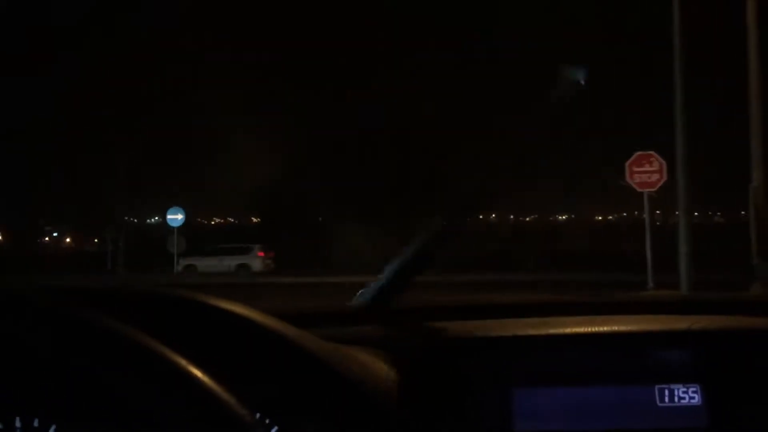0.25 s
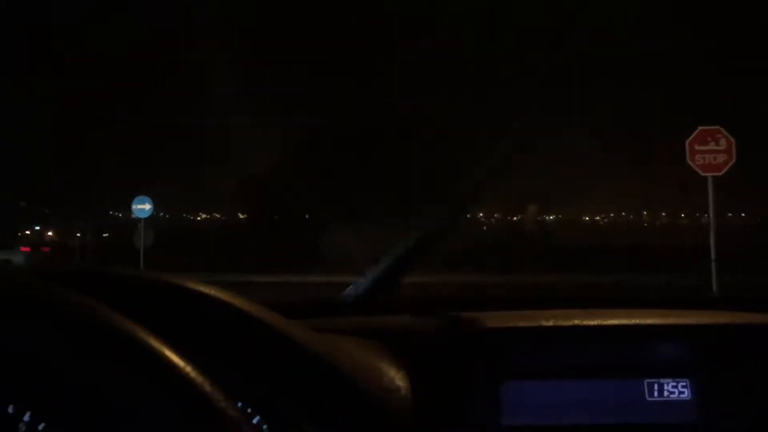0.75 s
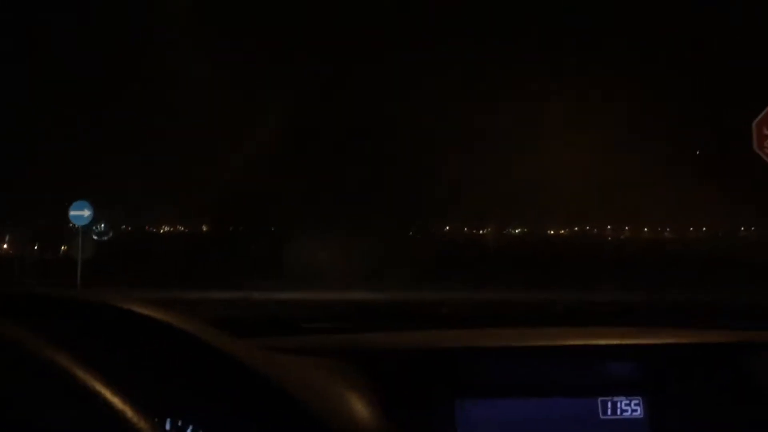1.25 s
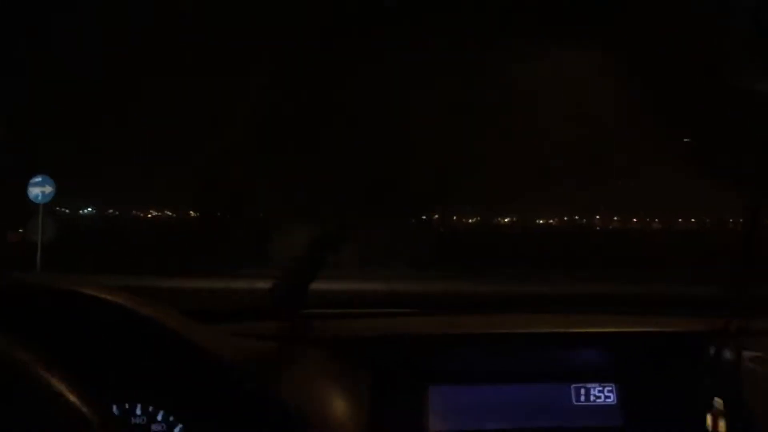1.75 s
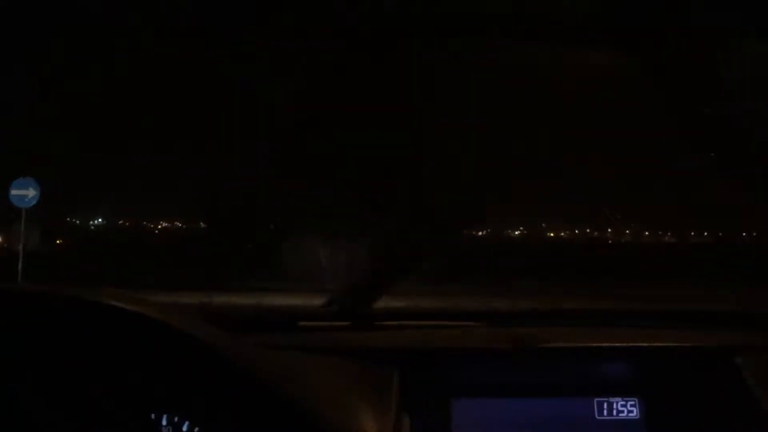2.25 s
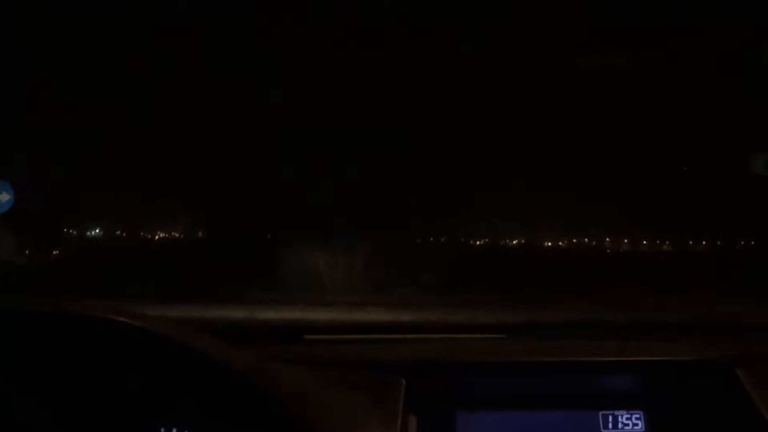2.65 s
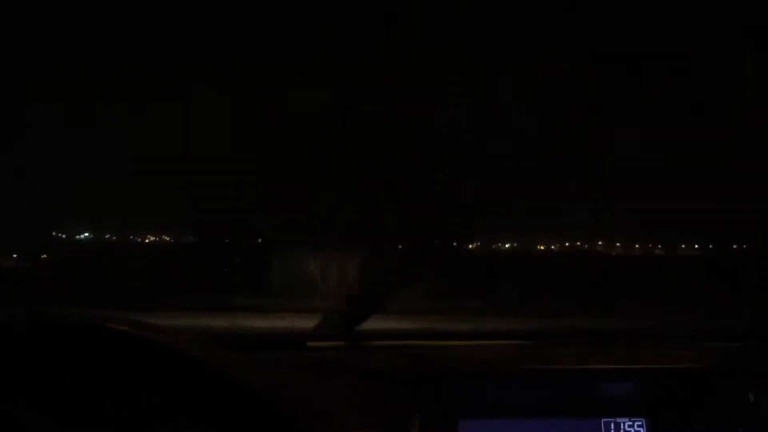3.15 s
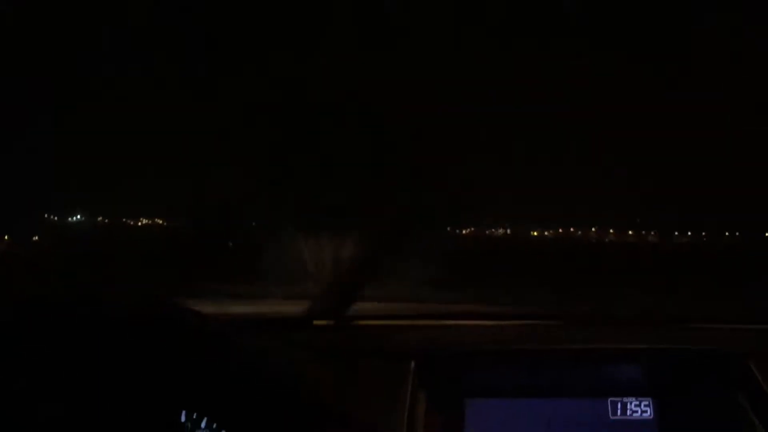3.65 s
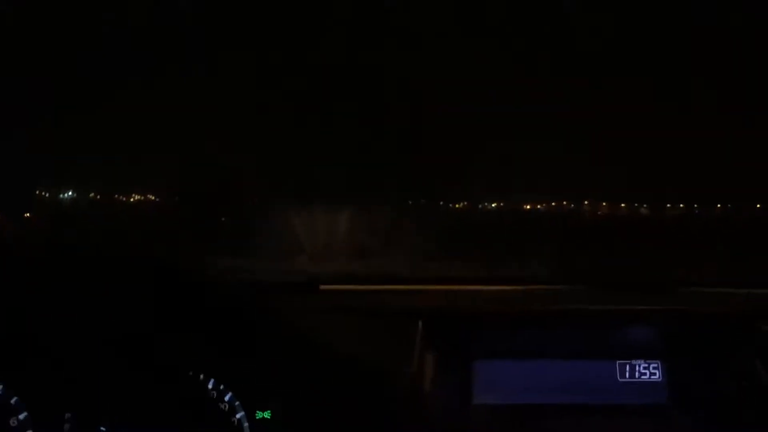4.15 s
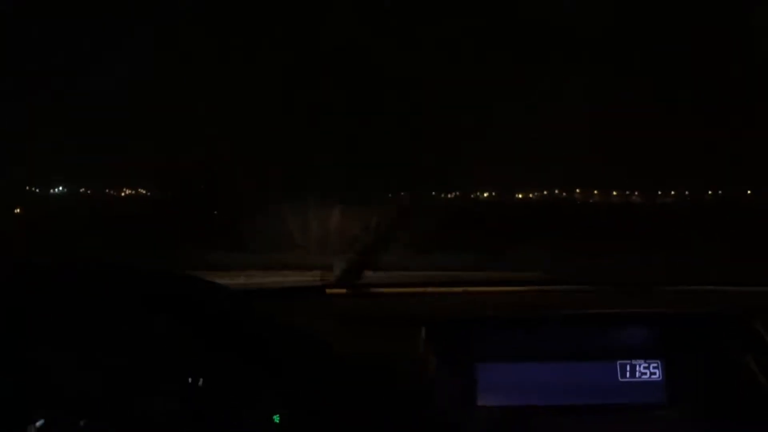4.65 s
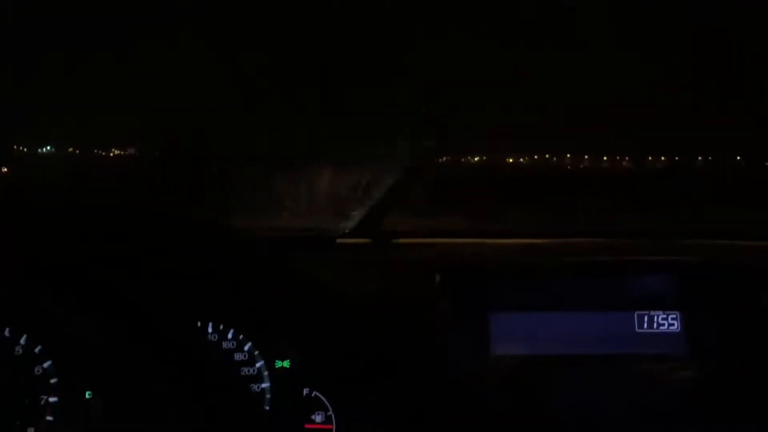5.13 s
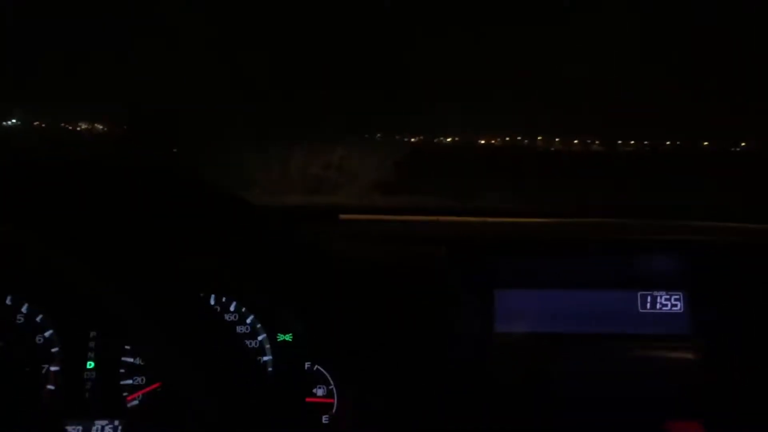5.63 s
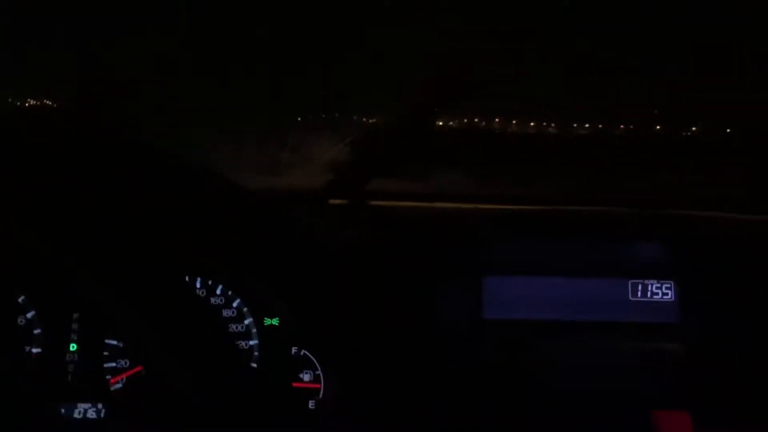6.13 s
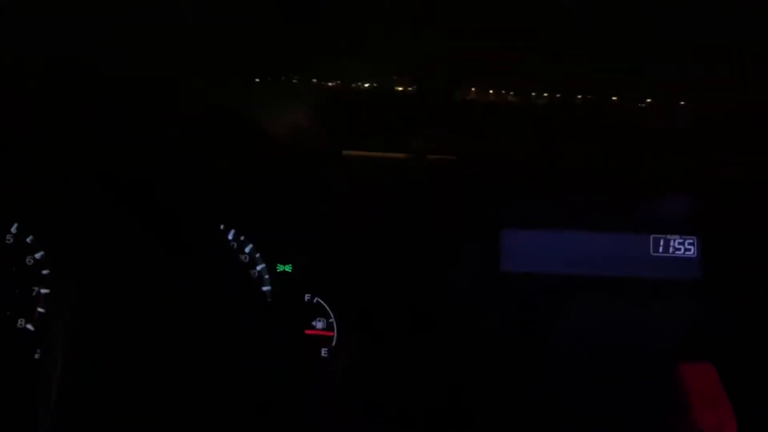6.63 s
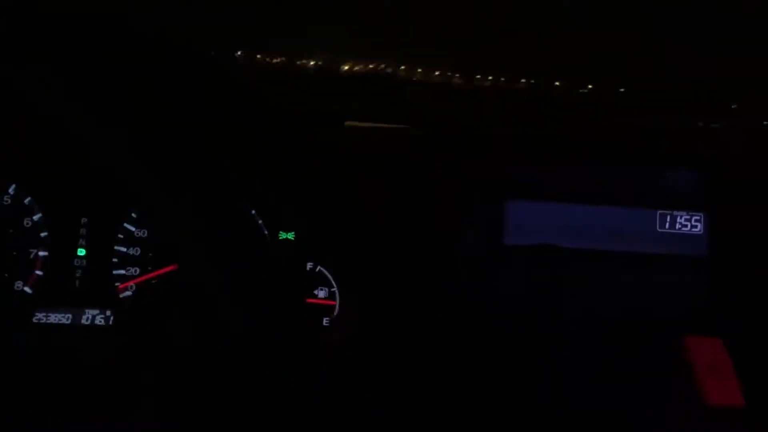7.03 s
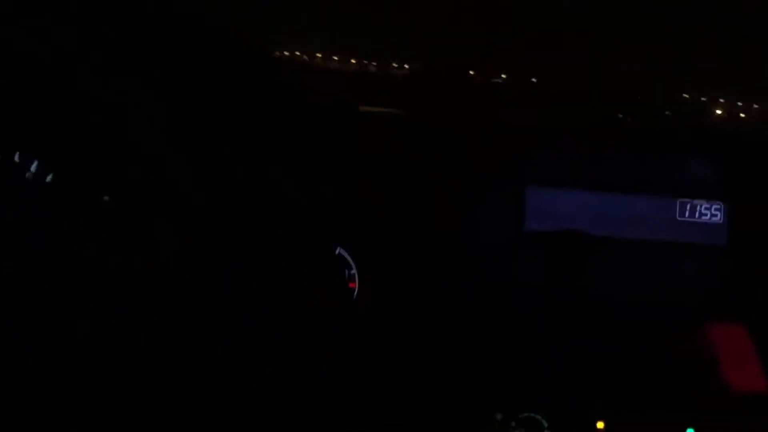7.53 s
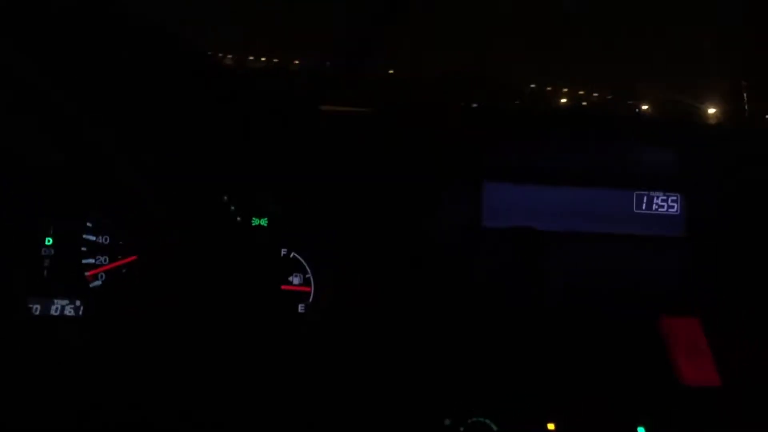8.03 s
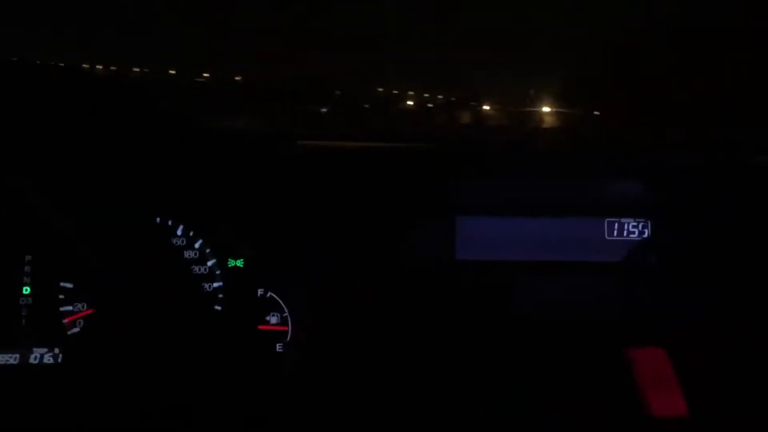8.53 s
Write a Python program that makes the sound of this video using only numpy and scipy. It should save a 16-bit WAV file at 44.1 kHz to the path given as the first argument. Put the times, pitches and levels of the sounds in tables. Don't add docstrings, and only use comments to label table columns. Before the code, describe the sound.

A close microphone on the driver's side of a boomy car cabin picks up bright rain ticks on glass, muffled roof patter and occasional hollow knocks. Wiper turns make regular deep double thuds. The engine slows, with a faint falling gear whine early on, then pulls again; a drive shaft hum rises near the end. Tyres rumble throughout, while rain thins midway but keeps arriving in small bursts.

```python
import sys
import numpy as np
from scipy import signal
from scipy.fft import rfft, irfft
from scipy.io import wavfile
from scipy.ndimage import uniform_filter1d

SR = 44100
rng = np.random.default_rng(int(sys.argv[2]) if len(sys.argv) > 2 else 0)


def ratio_of_db(decibels):
    return 10 ** (np.asarray(decibels, float) / 20)


def file_out(sig):
    cols = np.atleast_2d(sig).T
    lim = np.clip(cols, -1, 1)
    pcm = np.round(lim * 32767).astype(np.int16)
    wavfile.write(sys.argv[1], SR, pcm)


N = 387198


def level(x, db):
    return x * ratio_of_db(db) / np.sqrt(np.mean(x ** 2))


def columns(table):
    s, *rest = np.transpose(table)
    return [np.interp(np.arange(N) / SR, s, column) for column in rest]


def ring(x, hz, width_hz):
    return signal.lfilter(*signal.iirpeak(min(hz, .46 * SR), hz / width_hz, fs=SR), x)


def walk(rate):
    hold = int(SR / rate)
    steps = np.repeat(rng.standard_normal(N // hold + 1), hold)
    return 1.33 * uniform_filter1d(uniform_filter1d(steps, hold), hold)[:N]


def fade(power, t60):
    return signal.lfilter([1], [1, -np.exp(-2 * np.log(1000) / (t60 * SR))], power)


def hum(hz, db, orders, wobble):
    turn = 2 * np.pi * np.cumsum(hz * (1 + wobble * walk(9))) / SR
    out = 0
    for multiple, order_db in orders:
        size = ratio_of_db(1 + db + order_db + 1.2 * walk(6))
        out = out + size * np.sin(multiple * turn + 6 * rng.random())
    return out


# (pitch [Hz], width [Hz], level [dB])
BODY = [(167.3, 40, 3.5), (207.6, 14.2, 2.5), (247, 29, -2.5), (395, 107, -7), (860, 400, -24)]
BOOM_HZ, BOOM_WIDTH_HZ = 125, 25.3


def cabin(boom_force, body_force):
    boom = ring(ring(boom_force, BOOM_HZ, BOOM_WIDTH_HZ), BOOM_HZ, 3 * BOOM_WIDTH_HZ)
    body = sum(ratio_of_db(db) * ring(ring(body_force, f, w), f, 2 * w) for f, w, db in BODY)
    return ratio_of_db(26.5) * boom + ratio_of_db(20.5) * body


# (time [s], firing rate [Hz], firing level [dB], load on the upper multiples [dB])
ENGINE = [(0, 72.4, -33.5, 5), (.6, 67.86, -38, 10), (1.5, 70, -38, -2), (2.4, 76.63, -30.5, -9),
          (3, 76.24, -29, -7), (3.5, 68.1, -36.5, -10), (4.2, 56.26, -37.5, -4), (4.7, 52.7, -39, -3),
          (5.2, 53.64, -36.5, -13), (5.7, 58.37, -31, -2), (5.95, 60.93, -32.5, 1), (6.5, 62.55, -30, -3.5),
          (6.8, 62.8, -29.5, -8.5), (7.9, 63.8, -29.5, -25), (8.2, 63.4, -59, -4), (8.78, 63.2, -63, -2)]
# (multiple of the firing rate [-], level [dB])
ENGINE_ORDERS = [(.5, -10), (1, 0), (1.5, -12), (2, -6), (2.5, -10), (3, -12), (4, -11)]
# (time [s], rate [Hz], level [dB])
SHAFT = [
    (6.2, 65.5, -63),
    (6.7, 67.8, -42),
    (7.3, 69.9, -36),
    (7.7, 70.4, -55),
    (8.1, 75.23, -32.5),
    (8.3, 81.33, -29.5),
    (8.55, 84.7, -35.5),
    (8.78, 87.7, -28),
]
# (multiple of its rate [-], level [dB])
SHAFT_ORDERS = [(.5, -31), (1, 0.5), (3, -18.5)]
# (time [s], pitch [Hz],
# level [dB])
WHINE = [(.1, 396, -100), (.3, 390, -49), (.54, 379.4, -39.5), (.92, 361.7, -42.5), (1.08, 350, -58),
         (1.12, 438, -56), (1.22, 434, -44), (1.55, 407.8, -48), (1.95, 360.8, -45.5), (2.2, 346, -67),
         (3.4, 400, -70), (3.44, 405.4, -43), (3.55, 406, -43), (3.6, 403, -80)]
# (time [s], rumble level [dB])
TYRES = [(0, -25), (.96, -25.5), (1.35, -23.5), (1.45, -27), (1.85, -29), (2.15, -25.5), (2.75, -35),
         (3.0, -29), (4.6, -36.5), (5.6, -33.5), (6.5, -31.5), (7.2, -29), (8.0, -30.5), (8.78, -27)]
# (frequency [Hz], level per Hz [dB])
ROAD = [(20, -34), (32, -3.5), (45, -0.5), (65, -1), (100, -3.5), (200, -22.5), (400, -23.5), (900, -42),
        (3000, -56), (16000, -73.5)]


def drive():
    t = np.arange(N) / SR
    firing_hz, firing_db, load_db = columns(ENGINE)
    coasting = np.clip((4.2 - t) / 0.412, 0, 1)
    orders = [(k, db + (k > 1) * (load_db - 8 * coasting)) for k, db in ENGINE_ORDERS]
    engine = hum(firing_hz, firing_db, orders, wobble=.005 + .09 * coasting)
    shaft = hum(*columns(SHAFT), SHAFT_ORDERS, wobble=0.0091)
    gears = hum(*columns(WHINE), [(0.98, 0)], wobble=0.004)

    rumble_db, = columns(TYRES)
    f = np.fft.rfftfreq(N, 1 / SR) + 1
    road_hz, road_db = np.transpose(ROAD)
    colour = ratio_of_db(np.interp(np.log(f), np.log(road_hz), road_db, left=-40))
    rumble = level(irfft(rfft(rng.standard_normal(N)) * colour, N), -3.5)
    rumble = rumble * ratio_of_db(rumble_db + 0.44 * walk(6.7))

    fading_db = -0.5263 * t
    boom_db = -31 + fading_db + 0.81 * (rumble_db + 30.0)
    body_db = -35.5 + fading_db + 0.23 * (rumble_db + 29.5)
    bumps_db = [boom_db - 0.5 + 0.95 * walk(9.3), body_db + 1.8 * walk(11)]
    bumps = rng.standard_normal((2, N)) * ratio_of_db(bumps_db)
    return engine + shaft + gears + rumble + cabin(*bumps)


# (frequency [Hz], level per band [dB], tail t60 [s])
GLASS = [(570, -18, 0.09), (874, -17, 0.22), (1480, -7, 0.084), (3000, -2, 0.082), (4000, -3.5, 0.077),
         (7200, -12.5, 0.047), (9400, -17, 0.07), (12000, -14.5, 0.074), (15800, -33, 0.044)]
BANDS = 500 * 2 ** np.arange(0, 5.1, 1 / 3)
BENDING_LAG_S = .00105


def splash(s, band_db, crack_s, tail_db, tick_db):
    glass_hz, glass_db, glass_t60 = np.transpose(GLASS)
    echo_s, echo_db = .0015, -4.5
    out = 0
    for f, db in zip(BANDS, band_db):
        size = ratio_of_db(db + np.interp(np.log(f), np.log(glass_hz), glass_db))
        t60 = np.interp(np.log(f), np.log(glass_hz), glass_t60)
        lag = BENDING_LAG_S * (3000 / f) ** .25
        at = np.clip(((s + lag) * SR).astype(int), 0, N - 1)
        power = np.bincount(at, size ** 2, N)
        shape = fade(power, crack_s) + ratio_of_db(tail_db) ** 2 * fade(power, t60)
        burst = np.sqrt(shape * SR / f) * rng.standard_normal(N)
        tick = ratio_of_db(tick_db) * SR / f * np.bincount(at, size, N)
        burst = burst + tick + ratio_of_db(echo_db) * np.roll(tick, int(echo_s * SR))
        out = out + ring(ring(burst, f, 0.5 * f), f, 0.5 * f)
    return out


def shower(count, flow_db, colour_db, spread_db, slant_db, gust_db, crack_s, tail_db):
    when, luck, slant = rng.random((count, 3)).T
    size_db = spread_db * np.minimum(-np.log(1 - luck), 2)
    flow_db = (flow_db + gust_db * walk(25))[(when * N).astype(int)]
    tilt_db = np.log2(BANDS / 3000)[:, None] * slant_db * (2 * slant - 1)
    patchy_db = 3.5 * rng.standard_normal((count, len(BANDS))).T
    band_db = size_db + flow_db + tilt_db + patchy_db + colour_db[:, None]
    return splash(when * N / SR, band_db, crack_s, tail_db, tick_db=0.47)


def plinks(flow_db, count):
    low_hz, high_hz, plink_db, t60_s = 600, 3000, -1, .04
    out = np.zeros(N + 4096)
    t = np.arange(4096) / SR
    for when, pitch, size in rng.random((count, 3)):
        at = int(when * N)
        hz = low_hz * (high_hz / low_hz) ** pitch
        db = flow_db[at] + plink_db + 4 * size - 5 * np.log2(hz / 1000) - 60 * t / t60_s
        swell = np.minimum(t / 0.0035, 1)
        out[at:at + 4096] += ratio_of_db(db) * swell * np.sin(2 * np.pi * hz * t)
    return out[:N]


# (time [s], flow level [dB], roof above the glass [dB])
RAIN = [
    (0, -50.5, 2),
    (1, -49, 6.5),
    (2, -51.5, 6),
    (3, -48.5, 7.5),
    (4.1, -56, 14),
    (5.2, -58, 13),
    (6.5, -55.5, 15),
    (7.6, -58.5, 12.5),
    (8.78, -53.5, 12.5),
]
# (time [s], half length [s], level [dB])
GUSTS = [(0.336, 0.11, 9.5), (0.698, 0.036, -9), (2.003, 0.07, 13), (2.236, 0.03, 6), (2.906, 0.21, 3.5),
         (3.346, 0.02, 11), (4.202, 0.26, 5.5), (5.66, 0.068, 5.5), (6.095, 0.03, 17.5), (6.478, 0.025, 13),
         (6.95, 0.086, 5.5), (7.216, 0.13, 4.5), (7.701, 0.03, 8), (7.99, 0.082, 10), (8.387, 0.089, 9),
         (8.75, 0.094, 6)]
# (time [s], half length [s], level [dB])
LULLS = [(.1, 0.014, -10), (1.23, 0.035, -1), (1.66, 0.046, -10), (1.81, 0.11, -10.5), (2.17, 0.034, -16),
         (2.3, 0.017, -10), (2.57, 0.14, -18), (2.73, 0.033, -25), (3.28, 0.019, -19), (3.58, 0.029, -17),
         (3.78, 0.045, -3), (4.55, 0.051, -3), (4.8, 0.03, -2), (5.22, 0.15, -7), (6.2, 0.16, -9),
         (6.78, 0.039, -5), (7.07, 0.034, -7), (7.51, .03, -11), (8.24, 0.05, -2.5)]
# (frequency [Hz], level over the glass colour [dB])
LINING = [(500, 6.5), (1000, 3), (1500, 0), (2800, -8.5), (4300, -13.5), (6000, -16), (16000, -10.5)]


def patter():
    flow_db, roof_above_db = columns(RAIN)
    t = np.arange(N) / SR
    wind_db = sum(db * np.exp(-((t - s) / half) ** 2) for s, half, db in [*GUSTS, *LULLS])
    glass_db = flow_db + wind_db
    roof_db = flow_db + roof_above_db + 0.52 * wind_db
    lining_hz, lining_db = np.transpose(LINING)
    dull_db = np.interp(np.log(BANDS), np.log(lining_hz), lining_db)
    thin_db = np.minimum(12.0 * np.log2(BANDS / 3000), 0)
    on_glass = shower(650, glass_db - 1.5, thin_db, spread_db=4.5, slant_db=3.0, gust_db=1.0,
                      crack_s=0.0024, tail_db=-10)
    on_roof = shower(1300, roof_db - 3, dull_db, spread_db=1.8, slant_db=3.0, gust_db=1.0,
                     crack_s=0.005, tail_db=-5.5)
    return on_glass + on_roof + plinks(roof_db, count=800)


# (time [s], peak level [dB], centre of the struck modes [Hz])
CHINKS = [(3.496, -41, 9500), (3.513, -50, 10000), (3.549, -41, 9000), (4.146, -45, 9800),
          (4.165, -47, 12000), (4.198, -51, 11500), (4.233, -49, 11000), (4.296, -53, 13000),
          (4.868, -45, 8950), (5.439, -45.5, 9800), (7.568, -52, 10000), (8.125, -48, 12400),
          (8.722, -55, 10010)]
# (pitch [Hz], level [dB], t60 [s])
METAL = [(5350, -5, .1), (6570, -4, .09), (8400, -2, .015), (8800, 0, .018), (9250, -1, .015),
         (9770, 1.5, .03), (10300, -2, .015), (10900, -1.5, .03), (11600, -2.5, .022), (12150, -4, .015),
         (12600, -4, .02), (13200, -5, .02), (14200, -8, .035), (14900, -6, .02)]


def chinks():
    out = np.zeros(N)
    t = np.arange(4096) / SR
    hz, mode_db, t60 = np.transpose(METAL)[:, :, None]
    chance = rng.standard_normal((len(CHINKS), 2, len(METAL), 1))
    for (s, db, centre_hz), (mix, tune) in zip(CHINKS, chance):
        away_db = -15 * np.abs(np.log2(hz / centre_hz))
        size_db = db + mode_db + 4.5 * mix + away_db
        swell = np.minimum(t / .001, 1)
        rings = ratio_of_db(size_db - 60 * t / t60) * swell * np.sin(2 * np.pi * hz * (1 + .008 * tune) * t)
        at = int(s * SR)
        out[at:at + 4096] += ratio_of_db(-4) * rings.sum(0)[:N - at]
    return out


# (time [s], peak level [dB], ring pitch [Hz])
KNOCKS = [(0.148, -28, 1350), (.15, -25.5, 690), (.289, -31, 950), (0.476, -33, 1080), (0.511, -32, 1440),
          (2.808, -31, 810), (1.378, -32, 1490), (1.438, -27, 601), (1.441, -26.5, 1320),
          (1.543, -29.5, 800), (1.713, -32.5, 1460), (1.801, -36.5, 626), (7.115, -31, 750),
          (2.319, -33, 960), (2.798, -28.5, 790), (2.866, -28, 1860), (2.952, -30.5, 1170),
          (3.108, -29.5, 765), (3.452, -27, 1100), (3.667, -29, 939), (4.78, -30.5, 1230),
          (4.867, -31, 810), (4.9, -28, 1740), (4.958, -31, 540), (4.984, -31, 1003), (5.38, -35, 724),
          (5.591, -37, 1140), (5.621, -30.5, 1069), (5.772, -30.5, 1470), (6.076, -30.5, 1200),
          (6.463, -28, 1200), (7.184, -25.5, 990), (5.678, -38, 1090), (7.548, -33, 755),
          (7.672, -29, 1368), (7.759, -32, 980), (7.802, -24.5, 1010), (7.975, -32, 1290),
          (8.028, -25, 1300), (8.291, -33.5, 940), (8.382, -20, 1670), (8.476, -34, 1010),
          (8.682, -34, 650)]


def knocks():
    out = np.zeros(N)
    t = np.arange(4096) / SR
    for s, db, hz in KNOCKS:
        push = rng.standard_normal((2, 4096)) * ratio_of_db(-60 * t / 0.16)
        push[0, :8] += 2.5
        late = ratio_of_db(4.5) * (1 - np.exp(-t / 0.012)) * push[1]
        low_hz = 0.713 * hz
        first = ring(ring(push[0], hz, .2 * hz), hz, .5 * hz)
        second = ring(ring(late, low_hz, .13 * hz), low_hz, .4 * hz)
        burst = first + second
        at = int(s * SR)
        out[at:at + 4096] += (burst * ratio_of_db(db - 4.5) / np.abs(burst).max())[:N - at]
    return out


TURN_DB = [-4.5, -0.5, -0.8, -1, -0.52, 2, -1.5, 0.7, -1.7, 2, -0.6, 2, 0.5]


def wipers():
    bottom_s, sweep_s, up_s = 0.7154, 1.4656, 0.709
    bottom_levels_db, top_levels_db = (-22, -26.5, -27, -39.5), (-24.5, -32.5, -26.5, -41)
    t = np.arange(N) / SR
    boom = body = 0
    for k, turn_db in enumerate(TURN_DB):
        since = t - (bottom_s + (k - 1) // 2 * sweep_s + (k - 1) % 2 * up_s)
        boom_db, drag_db, body_db, rub_db = np.add(bottom_levels_db if k % 2 else top_levels_db, turn_db)
        boom = boom + ratio_of_db(boom_db) * np.exp(-((since + 0.021) / 0.043) ** 2)
        boom = boom + ratio_of_db(drag_db) * np.exp(-((since + 0.12) / 0.056) ** 2)
        flip = np.exp(-((since + 0.023) / 0.026) ** 2) + ratio_of_db(-17.0) * np.exp(-(since / 0.13) ** 2)
        body = body + ratio_of_db(body_db) * flip + ratio_of_db(rub_db) * np.exp(-((since + 0.1) / 0.05) ** 2)
    timing, strength = rng.standard_normal((800, 2)).T
    at = np.cumsum(SR / 60 * np.exp(.2 * timing)).astype(int)
    slips = np.bincount(at[at < N], ratio_of_db(1.5 * strength[at < N]), N)
    shake = level(slips - slips.mean(), -2.6) + level(rng.standard_normal(N), -4.5)
    return cabin(shake * boom, shake * body)


# (time of the peak [s], peak level [dB], cabin ring pitch [Hz])
SLIPS = [(0.558, -15, 137), (0.691, -15, 139), (0.706, -5.5, 149), (0.723, -18, 135), (0.756, -12, 165),
         (1.295, -14, 139), (1.318, -8, 136), (1.232, -19, 136.2), (1.413, -17, 190), (1.431, -23, 154),
         (2.086, -15, 124.3), (2.138, -8, 140), (2.162, -10, 174), (2.174, -10, 140), (2.788, -11.5, 139),
         (2.86, -18, 185), (2.891, -15, 138), (3.505, -16, 133), (3.555, -11, 142), (3.606, -17, 150),
         (3.63, -11, 162), (3.645, -27, 131), (4.328, -19.5, 210), (4.357, -17.2, 143), (5.027, -9.5, 138),
         (5.07, -14, 139), (5.095, -5.5, 142), (5.714, -14.5, 165), (5.791, -16.5, 174),
         (5.808, -16.5, 201), (5.828, -14, 159), (6.425, -15, 137), (6.467, -9, 142), (6.487, -14, 146.6),
         (6.543, -8, 150), (6.566, -7, 145), (6.586, -9, 146), (7.197, -18, 130), (7.261, -12.5, 179),
         (7.299, -14, 157), (7.959, -16, 133), (7.979, -20, 145.2), (8.006, -13, 148), (8.027, -6, 152),
         (8.039, -13.5, 129), (8.053, -26, 146), (8.724, -21, 123), (8.757, -15, 150)]


def thuds():
    rise_s, fall_s, slip_db, panel_hz = 0.0054, .012, -5.5, 194
    out = np.zeros(N + 4096)
    t = (np.arange(4096) - 1024) / SR
    shape = np.where(t < 0, np.exp(-(t / rise_s) ** 2), np.exp(-np.abs(t) / fall_s))
    for s, db, hz in SLIPS:
        at = int(s * SR) - 1024
        share = np.clip((panel_hz - hz) / 60, 0, 1)
        boom = share * np.cos(2 * np.pi * (BOOM_HZ + 3) * (at / SR + t))
        panel = (1 - share) * np.cos(2 * np.pi * 1.13 * hz * t)
        out[at:at + 4096] += ratio_of_db(db + slip_db) * shape * (boom - panel)
    return out[:N]


# (time [s], treble peak level [dB])
TICKS = [(0.163, -36), (0.417, -34), (0.6789, -28.5), (0.8034, -37), (1.0031, -37), (1.4553, -38),
         (1.6539, -41), (1.729, -39), (1.9385, -38), (2.8614, -33), (3.3065, -34.5), (3.3732, -40),
         (3.3927, -37), (3.997, -42), (4.2054, -37), (4.8817, -35), (5.5308, -38), (6.3537, -37),
         (7.1682, -28.5), (8.1758, -38)]


def ticks():
    s, db = np.transpose(TICKS)
    tilt_db = 4.9 * np.log2(BANDS / 6000)[:, None]
    patchy_db = 2 * rng.standard_normal((len(s), len(BANDS))).T
    return splash(s, db + 1.5 + tilt_db + patchy_db, crack_s=.003, tail_db=-15, tick_db=-1)


# (time [s], treble peak level [dB])
NEAR_DROPS = [(0.0503, -33.5), (0.2505, -29), (0.3019, -27), (0.377, -33), (0.4459, -28.5), (0.4748, -29),
              (0.5112, -31.5), (0.571, -29.5), (0.6977, -25.5), (0.9495, -28), (1.3625, -33),
              (1.5858, -27.5), (2.0273, -34), (2.0461, -29.5), (2.1141, -26.5), (2.2159, -27), (2.231, -31),
              (2.9442, -31), (2.993, -28.5), (3.0665, -32), (3.3124, -33), (3.4206, -33), (3.6102, -34.5),
              (4.8636, -32), (6.2602, -32.5), (6.6413, -36), (6.8967, -34), (7.1833, -29), (7.673, -25),
              (7.9733, -28.5)]
# (time [s], peak level [dB])
MID_DROPS = [(0.0137, -35), (0.204, -28.5), (0.833, -34), (1.269, -38), (1.3081, -27), (1.491, -29.5),
             (1.712, -27.5), (1.908, -33), (1.9738, -29), (2.411, -29.5), (2.441, -24.5), (2.4961, -31.5),
             (2.6646, -28), (2.791, -31.5), (3.1813, -29), (3.3368, -27.5), (3.383, -26.5), (3.8693, -31),
             (4.0071, -28), (4.0659, -24.5), (4.362, -28.5), (4.6857, -32), (5.4894, -34), (5.624, -29),
             (6.103, -25.5), (6.242, -30.5), (6.4475, -26.5), (7.8373, -31), (7.9453, -27), (8.4115, -29.5)]
# (time [s], peak level [dB])
FAR_DROPS = [(0.5304, -33), (0.583, -27.5), (1.016, -24.5), (1.143, -31.5), (2.159, -34), (2.265, -28),
             (2.3192, -31.5), (2.391, -36), (2.6386, -32), (2.8645, -25.5), (3.121, -28), (3.469, -31.5),
             (3.6977, -28.5), (3.8185, -34), (4.125, -35), (4.413, -36), (4.589, -31), (4.723, -31.5),
             (4.9, -31.5), (4.9838, -29.5), (5.052, -33), (5.1847, -37), (5.5922, -29), (5.9815, -31),
             (6.317, -32.5), (6.354, -35), (6.495, -38), (6.6834, -28.5), (8.4692, -32.5), (8.594, -31)]
# (time [s], peak level [dB])
LIGHT_DROPS = [(0.175, -29.5), (0.606, -31.5), (0.775, -33), (2.1536, -37), (0.849, -33), (0.9652, -28.5),
               (1.0906, -31.5), (1.176, -34), (1.4247, -34), (1.6699, -36.5), (1.9316, -36), (2.069, -34),
               (2.3425, -38), (2.841, -30), (3.259, -31), (3.851, -32.5), (3.9521, -36), (4.0367, -34),
               (4.8199, -41), (5.5009, -32), (5.667, -36), (5.8603, -34), (5.955, -40), (6.4, -32.5),
               (6.962, -35.5), (7.244, -34), (8.124, -33), (8.291, -35.5), (8.507, -36), (8.6582, -34.5)]
# (time [s], peak level [dB])
BRIGHT_TAPS = [(0.2704, -26), (0.3495, -29), (0.3953, -23.5), (0.4648, -28), (0.663, -29), (0.716, -30),
               (0.748, -33), (0.86, -30), (0.8787, -31), (0.8877, -26.5), (1.0376, -28.5), (1.0995, -30),
               (7.995, -36), (1.1619, -27), (1.1684, -32), (1.2804, -28.5), (7.742, -35.5), (4.136, -32),
               (1.3474, -31), (1.477, -31), (1.9373, -36), (1.986, -31), (2.0024, -32), (2.0854, -26.5),
               (2.1954, -32), (2.2077, -30), (2.2559, -30), (2.278, -31), (2.356, -29), (2.3732, -28.5),
               (2.6286, -34), (2.835, -30), (2.882, -26), (2.9025, -34), (2.9192, -38), (2.9347, -34),
               (3.0083, -25), (3.1566, -35), (3.217, -23.5), (3.2249, -29), (3.2361, -33), (3.3732, -33),
               (3.4966, -42), (4.0192, -32), (4.4322, -41), (4.9179, -35.5), (5.4615, -34), (5.5499, -32),
               (5.6324, -28.5), (5.7067, -39), (5.73, -36), (6.5029, -36), (6.6181, -30.5), (6.6641, -38),
               (6.8873, -31), (7.8268, -36), (8.0626, -31), (8.1093, -35.0), (8.7334, -33), (8.7524, -26)]
# (time [s], peak level [dB])
DULL_TAPS = [(0.0289, -34), (0.135, -25.5), (0.1454, -24), (0.2284, -30), (0.2876, -21.5), (0.334, -27),
             (0.361, -35), (0.4705, -21.5), (0.5441, -28), (0.5951, -35), (0.7368, -33), (1.0279, -26),
             (1.2424, -36), (1.5401, -27), (1.564, -27), (1.571, -24), (2.2473, -28), (2.4514, -26),
             (2.47, -28), (2.776, -31), (2.8888, -23), (2.953, -23), (2.965, -23), (3.0931, -31),
             (3.1299, -22), (3.2106, -40), (3.2538, -29), (3.344, -26), (3.356, -25), (3.3626, -30.9),
             (4.336, -29), (3.6691, -27), (4.092, -28), (3.918, -29), (4.046, -29), (4.11, -29),
             (4.6147, -27.5), (5.7713, -26.5), (6.196, -31.5), (6.5815, -40), (6.7237, -37), (6.8272, -32),
             (6.8588, -33), (6.9781, -31), (1.8798, -32), (7.2171, -34), (7.5533, -33), (7.5651, -35),
             (7.847, -31), (1.534, -29), (8.0405, -31), (8.0514, -34), (8.144, -29), (7.329, -28.5),
             (7.361, -28.5), (8.5266, -34), (8.462, -37), (8.55, -27), (8.5588, -37), (8.648, -30)]


def drops():
    kinds = NEAR_DROPS, MID_DROPS, FAR_DROPS, LIGHT_DROPS, BRIGHT_TAPS, DULL_TAPS
    kind_treble_db = 0.5, -5.5, -14, -5, -3.5, -14
    kind_offset_db = -1, -3.5, -1.5, -3, -7.5, -9
    pane_hz, pane_db, pane_t60_s = [2500, 2770, 2770, 3500, 4400, 5600], -6, .03
    spatter_s, spatter_db = 0.0065, -10
    counts = [len(kind) for kind in kinds]
    s, db = np.concatenate(kinds).T
    db = db + np.repeat(kind_offset_db, counts)
    treble_db = np.repeat(kind_treble_db, counts)

    bright = np.clip(np.log2(BANDS / 4200)[:, None] / .5, 0, 1)
    chance = rng.standard_normal((len(s), len(BANDS) + 2)).T
    colour_db = db + bright * (treble_db + 7) + (2.3 + 1.5 * bright) * chance[2:]
    late = s + spatter_s * (0.28 + np.abs(chance[0]))
    late_db = colour_db + spatter_db - 8 * (1 - bright)
    out = ratio_of_db(0.8) * splash(np.r_[s, late], np.c_[colour_db, late_db],
                            crack_s=0.0021, tail_db=-13.5, tick_db=-1)

    mode_hz = rng.choice(pane_hz, len(s)) * (1 + .04 * chance[1])
    mode_db = db + pane_db + 3 * chance[0] + (mode_hz > 4200) * treble_db / 2
    t = np.arange(2048) / SR
    shape = np.minimum(t / .0025, 1) * ratio_of_db(-60 * t / pane_t60_s)
    for at, size, hz in zip(((s + BENDING_LAG_S) * SR).astype(int), ratio_of_db(mode_db), mode_hz):
        out[at:at + 2048] += (size * shape * np.sin(2 * np.pi * hz * t))[:N - at]
    return out


def scene():
    car = drive() + chinks()
    rain = patter() + knocks() + ticks() + drops()
    return (car + rain + wipers() + thuds())[None]


def roll_off(x):
    return signal.sosfilt(signal.butter(12, 16800, fs=SR, output="sos"), x)


def record(dry):
    housed = dry - 0.54 * np.array([ring(dry[0], 10530, 910)])
    hissy = housed + ratio_of_db(-75.5) * rng.standard_normal(dry.shape)
    thin = signal.sosfilt(signal.butter(2, 27, "high", fs=SR, output="sos"), hissy)
    cut = signal.sosfilt(signal.ellip(8, .3, 70, 16200, fs=SR, output="sos"), thin)
    return roll_off(cut)


dry = scene()
out = record(dry)
file_out(out)
```